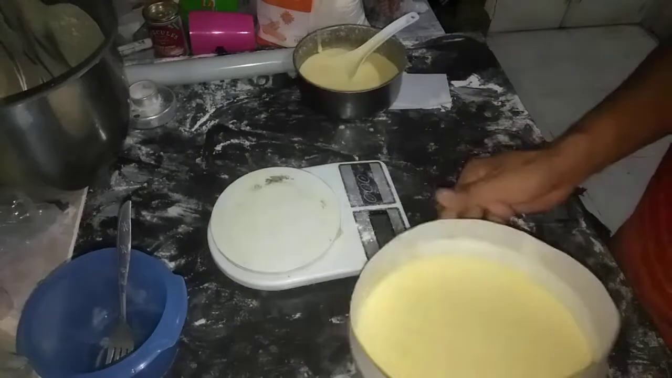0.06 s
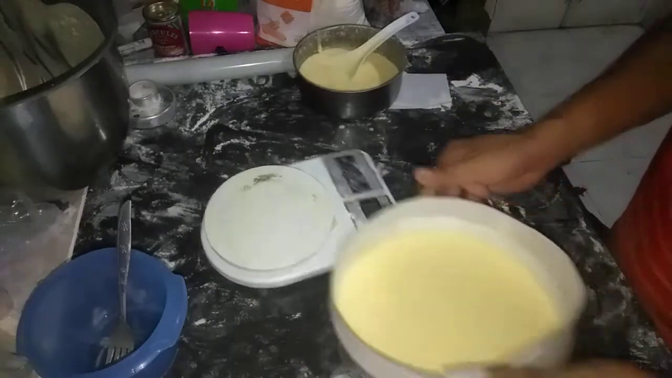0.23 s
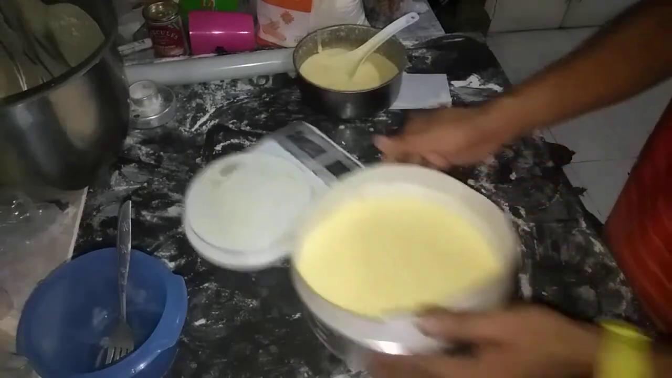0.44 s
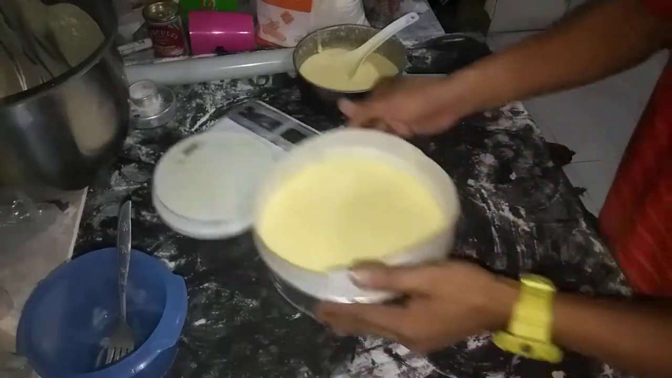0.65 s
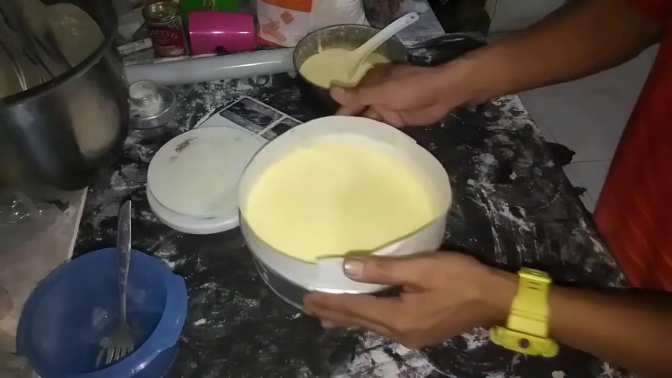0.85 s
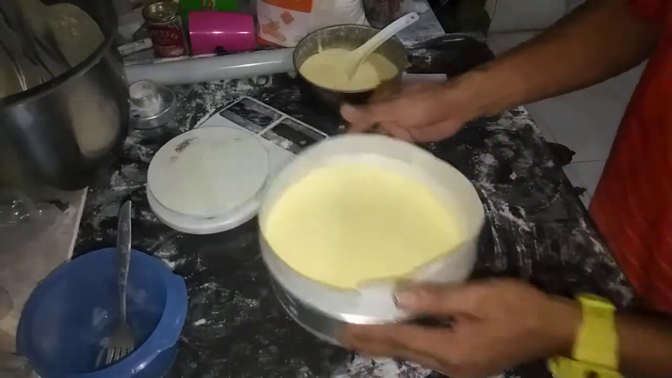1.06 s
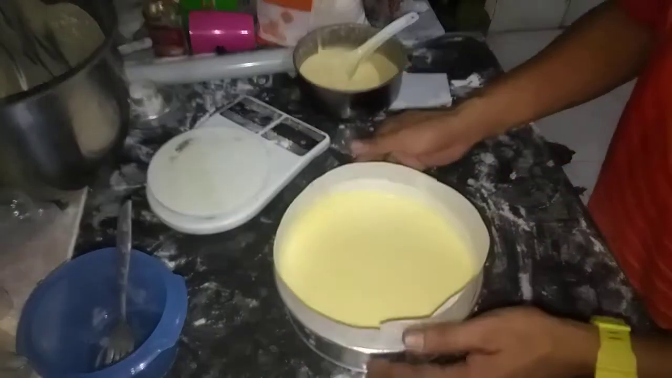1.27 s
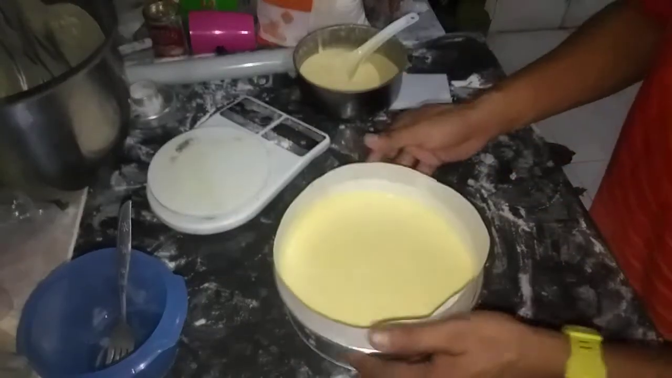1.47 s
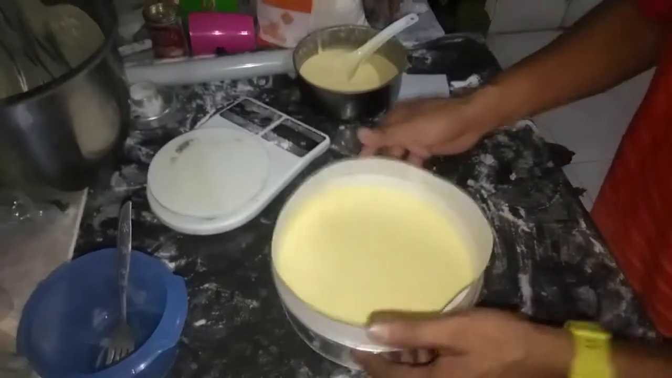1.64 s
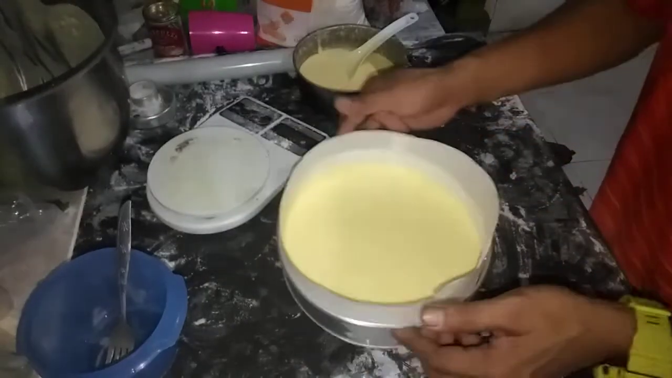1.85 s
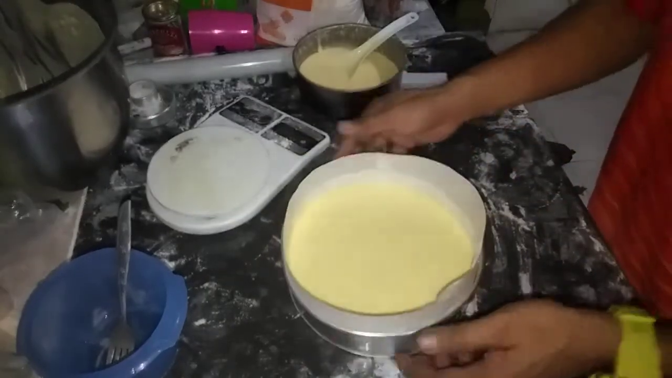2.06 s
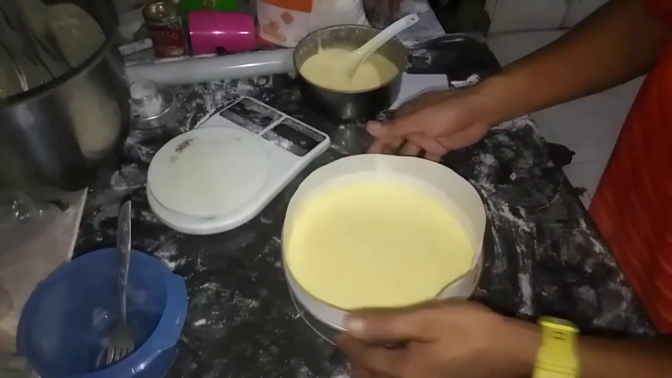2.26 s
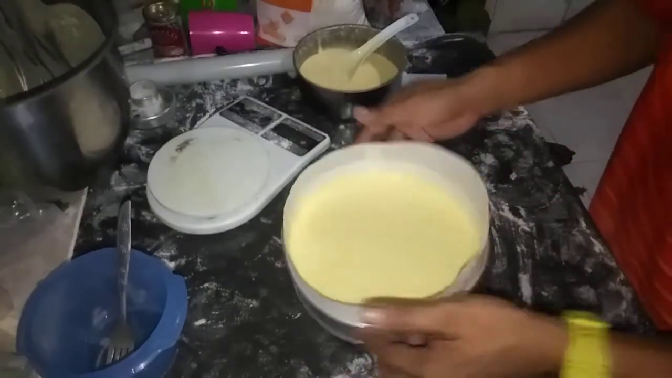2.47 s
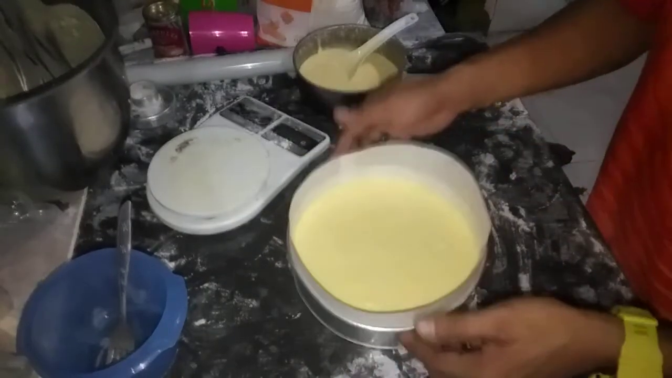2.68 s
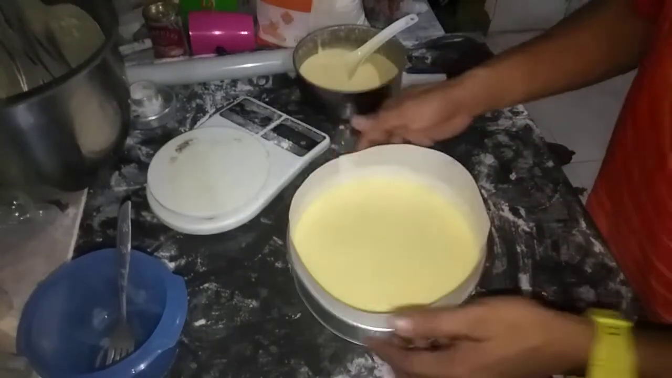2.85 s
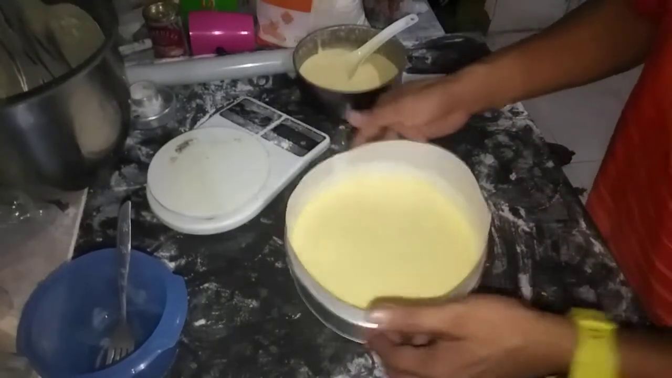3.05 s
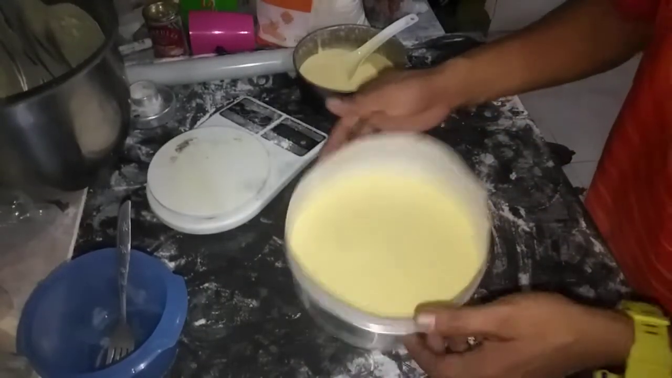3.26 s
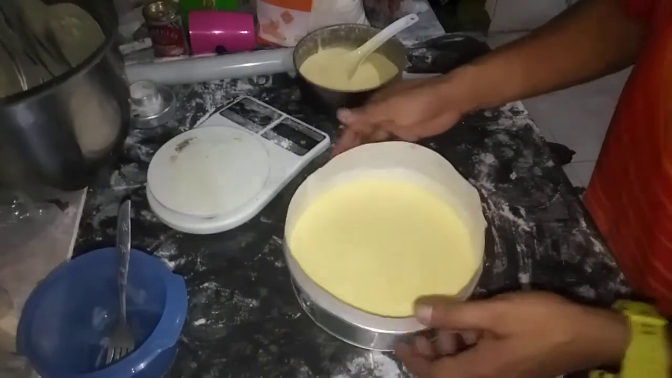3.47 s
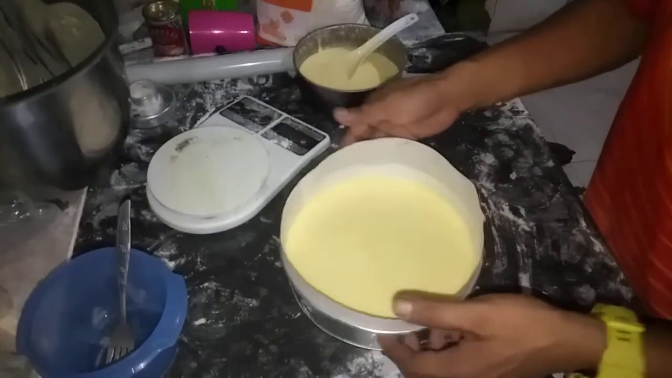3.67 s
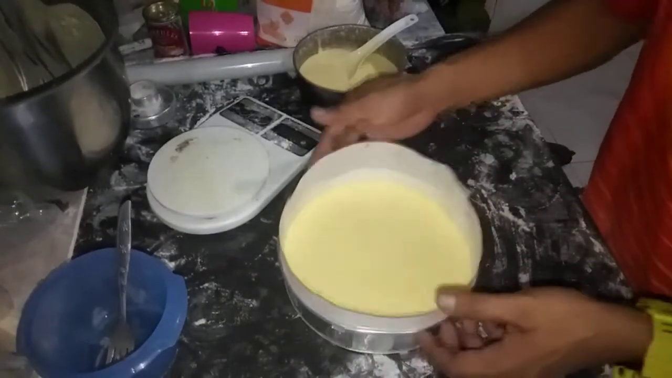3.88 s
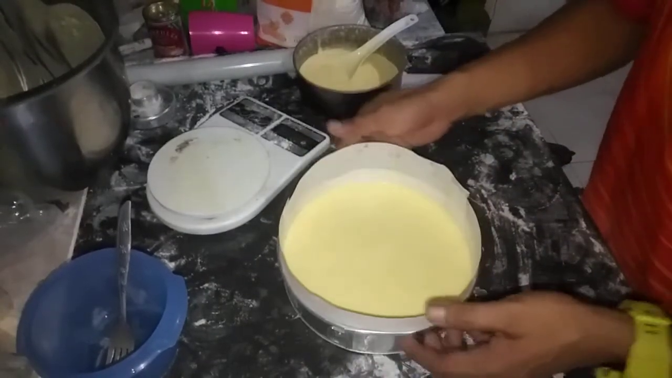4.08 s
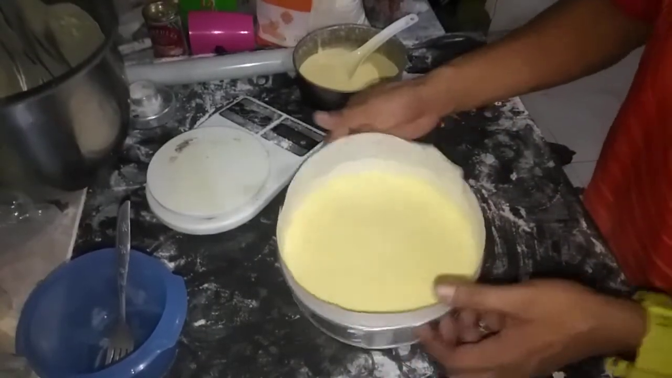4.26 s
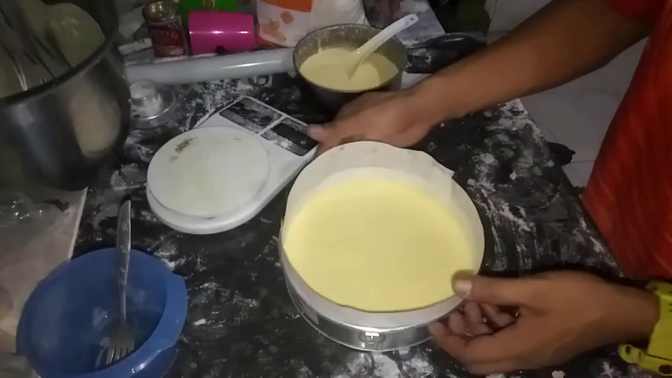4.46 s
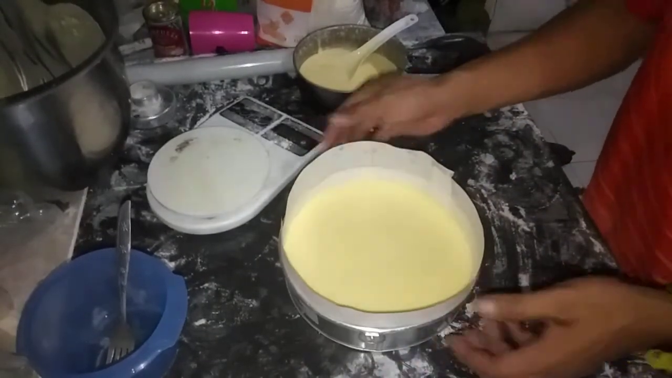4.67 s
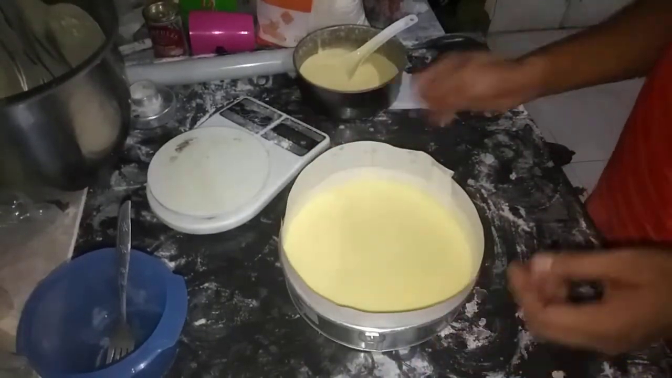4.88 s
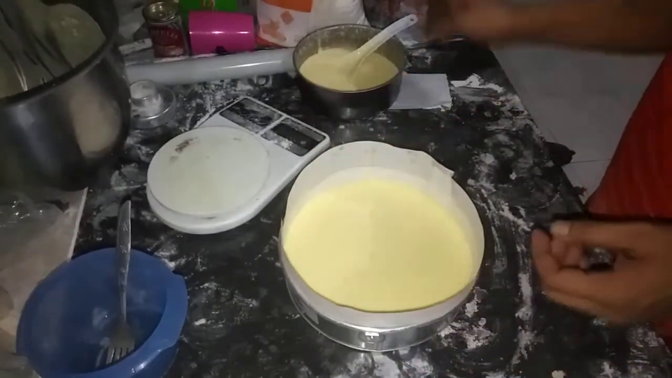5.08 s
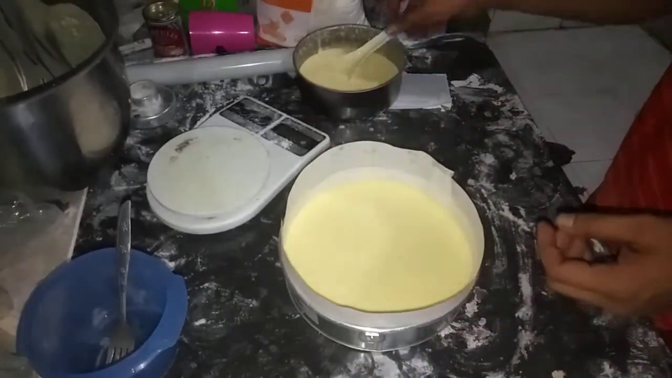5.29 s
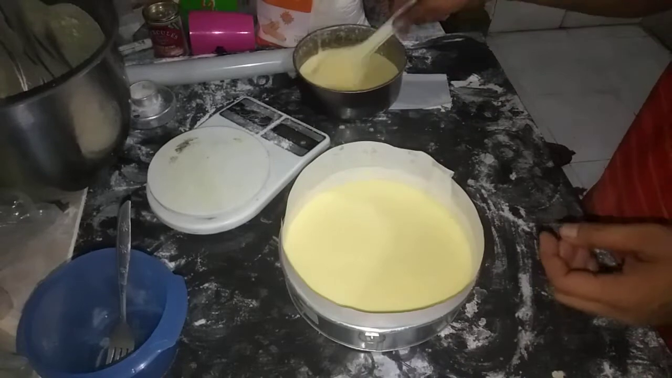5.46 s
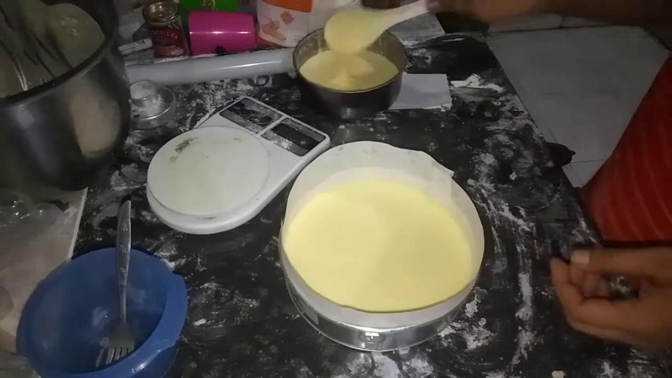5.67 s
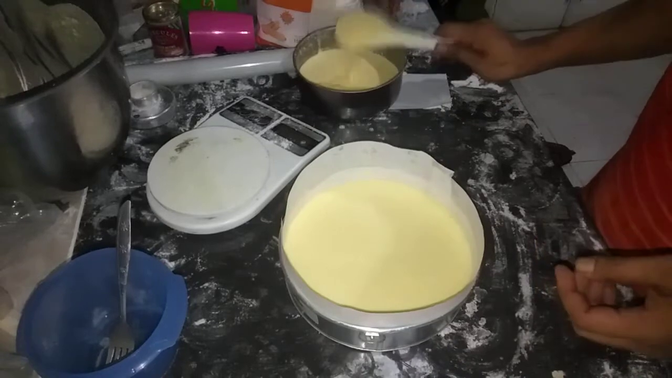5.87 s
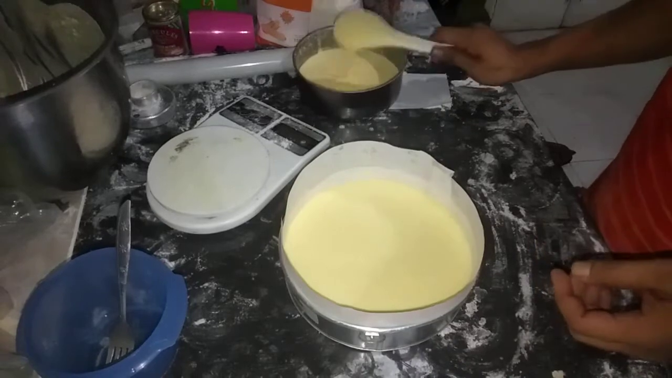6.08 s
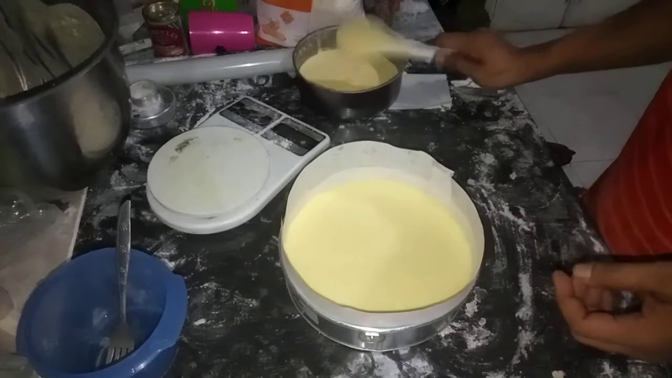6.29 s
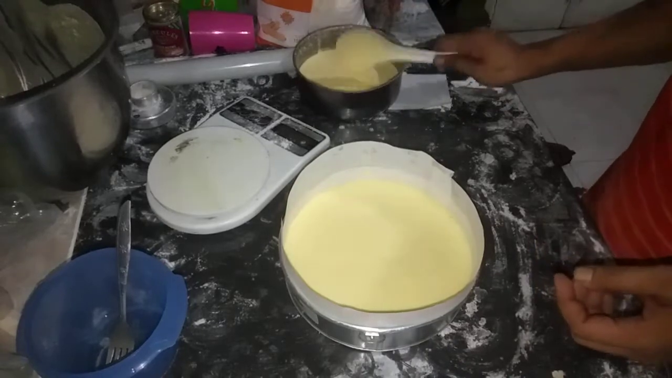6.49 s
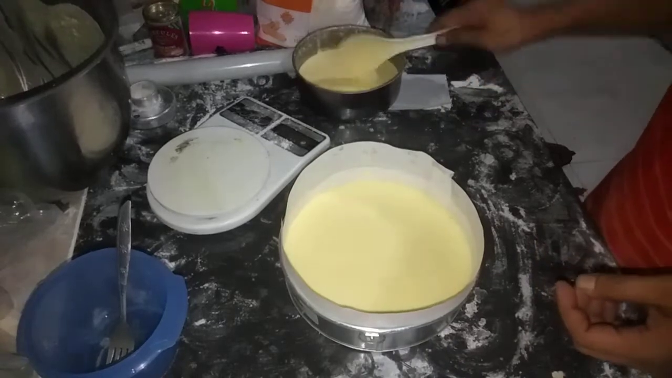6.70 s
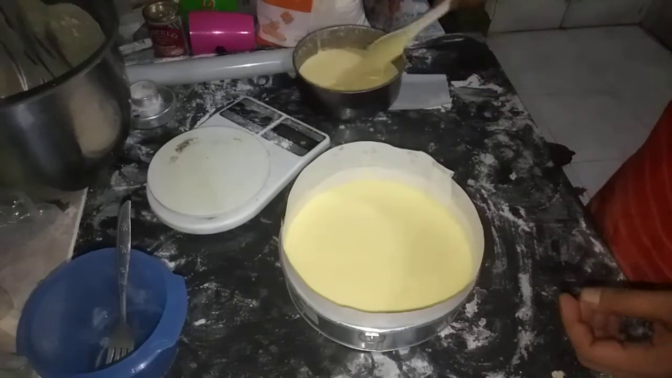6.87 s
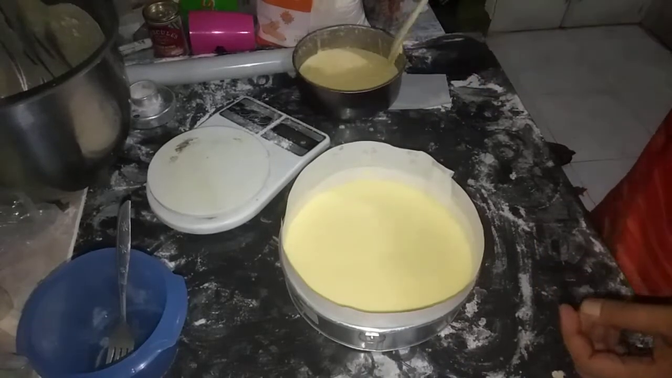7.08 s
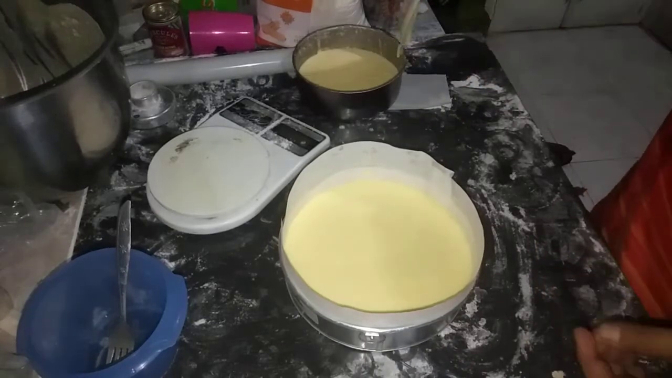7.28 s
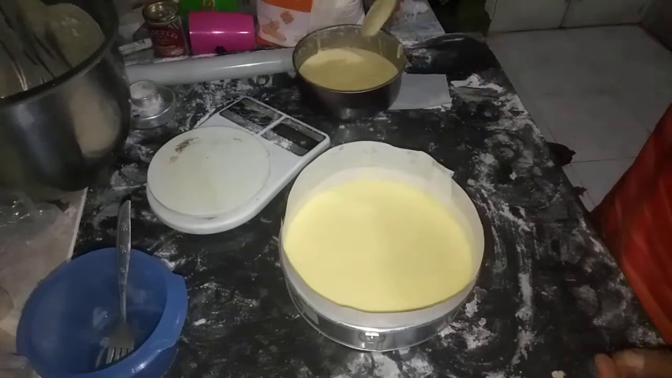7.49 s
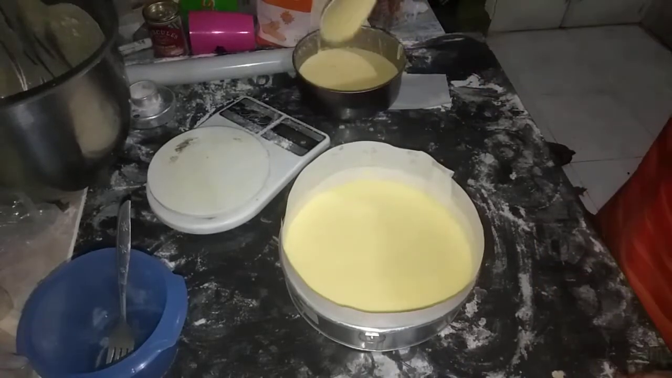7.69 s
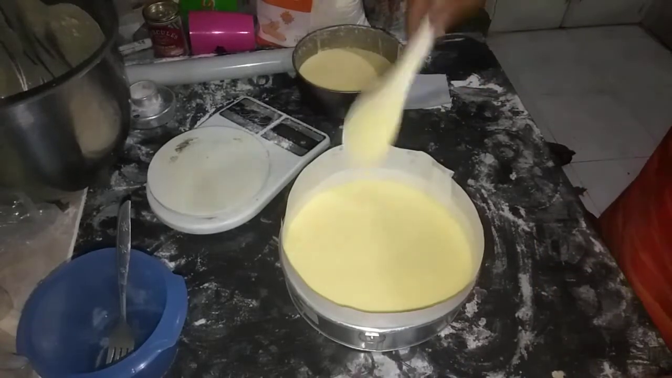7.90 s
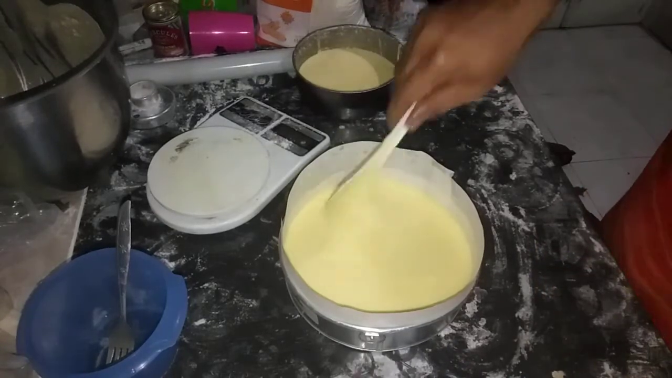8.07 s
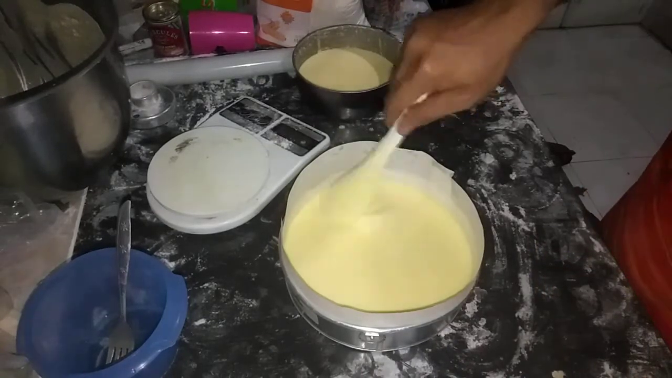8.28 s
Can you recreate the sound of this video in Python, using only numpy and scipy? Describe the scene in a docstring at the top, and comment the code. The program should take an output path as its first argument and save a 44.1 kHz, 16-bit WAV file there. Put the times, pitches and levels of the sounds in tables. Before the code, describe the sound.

After a faint scrape, six heavy, dull pan slams echo off hard kitchen walls, followed by five small bowl taps and a handle clack.

```python
"""A plastic kitchen scale is pushed aside on a stone counter: scraping noise, and bumps where its feet catch.
A batter-filled cake pan is then rapped down six times, rim first and then flat. A spatula is knocked on a bowl's
rim five times, and its handle drops against the rim. Each blow is a pulse built from quickly dying tones; it shakes
the counter and echoes in a hard-walled kitchen. Throughout there is shaped noise: quiet hum, faint rustle and
microphone hiss."""
import sys
import numpy as np
from scipy import signal
from scipy.io import wavfile
from scipy.ndimage import uniform_filter1d

SR = 44100
rng = np.random.default_rng(int(sys.argv[2]) if len(sys.argv) > 2 else 0)


def dump(signal):
    """Clip the signal to [-1, 1] and save it as 16-bit WAV at the path in sys.argv[1]."""
    limited = np.clip(np.atleast_2d(signal).T, -1, 1)
    pcm = np.round(limited * 32767).astype(np.int16)
    wavfile.write(sys.argv[1], SR, pcm)


N = 367794  # length in samples


def gain_of(db):
    """Turns decibels into a factor."""
    return 10 ** (np.asarray(db) / 20)


def evened(x):
    """Scales a signal to an rms of 1."""
    return x / np.sqrt(np.mean(x ** 2) + 1e-20)


def read(points, hz, axis=1):
    """Reads one column of a table at any frequency, with straight lines on a log-frequency axis."""
    table = np.transpose(points)
    return np.interp(np.log(hz + 1), np.log(table[0] + 1), table[axis])


def add(mix, s, sound):
    """Mixes a sound in at s seconds, cutting it off at the end of the mix."""
    part = mix[round(s * SR):][:len(sound)]
    part += sound[:len(part)]


def pan_raps():
    """The batter-filled pan meets the stone rim first and then flat; the batter damps its tones quickly."""
    # Every touch of the pan on the stone.
    # Each row: start in seconds, then thud, clack, crack, tick and counter level in dB.
    raps = [(1.1884, -23, -15.5, -17, -40, -56), (1.1918, -16, -23, -15.5, -37, -39.5),
            (1.194, -23.5, -17.5, -23, -35.5, -34), (1.9648, -12.5, -12.5, -28, -54, -44.5),
            (1.9737, -25.5, -20, -7.5, -28, -33.5), (1.9773, -26, -8, -8, -30.5, -41),
            (2.6818, -22, -12, -19.5, -49.5, -50.5), (2.6924, -19, -21, -9.5, -36, -35.5),
            (3.3108, -19.5, -11.5, -17, -39, -41), (3.3244, -18.5, -16, -13.5, -35.5, -37),
            (3.8915, -17, -13, -15, -44, -33.5), (3.8941, -22.5, -14, -13, -33, -41.5),
            (4.3617, -30, -29, -54, -64, -53), (4.4183, -23, -29.5, -48, -63, -44.5),
            (4.4295, -27, -12.5, -7.5, -43, -47.5)]
    # Tones of the pan. Each row: frequency in Hz, relative strength in dB, time to fall by 60 dB in seconds.
    pan = [(293, 4, 0.031), (447.3, 3, 0.018), (600, 0.5, 0.015), (806, -2.5, 0.02), (1110, 0, 0.0054),
           (1270, 0, 0.0077), (1447, -7, 0.012), (1810, 1, 0.0061), (2220, -3, 0.0072), (2770, 1.5, 0.0047),
           (3440, -4, 0.0011), (3780, -11.5, 0.0045), (4760, -16, 0.0021), (8130, -2.5, 0.0025),
           (11550, -4, 0.0028), (13300, 1, .0025), (14700, -10.5, .002)]
    return blows(raps, pan, [650, 1000, 1700, 2500, 5200, 7000],
                 shake_db=-6.5, chatter=0.13, chatter_s=0.0035)


def spatula_knocks():
    """The spatula hits the bowl's rim to shake batter off; batter in the bowl damps its tones."""
    # Each row: start in seconds, then thud, clack, crack, tick and counter level in dB.
    knocks = [(5.8347, -23, -24.5, -37, -40.5, -47), (6.0157, -22.5, -26.5, -37, -39, -47.5),
              (6.179, -22, -26.5, -38, -40.5, -49), (6.34, -23, -27, -37.5, -42, -44),
              (6.51, -25, -21, -45, -51, -46)]
    # Tones of the bowl. Each row: frequency in Hz, relative strength in dB, time to fall by 60 dB in seconds.
    bowl = [(294, -6.5, 0.043), (467, 4.5, 0.02), (690, 3.5, 0.011), (1070, 2.5, 0.005), (1630, -6, 0.005),
            (1800, -17.5, 0.015), (2680, 7, 0.005), (3630, -7.5, 0.0055), (5060, -4.5, 0.0077),
            (7780, 5, 0.003), (11000, 1.5, 0.0021), (13100, -1.5, 0.0033)]
    return blows(knocks, bowl, [800, 1200, 1800, 2500, 5500, 7000],
                 shake_db=-8.0, chatter=0.06, chatter_s=0.006)


def handle_drop():
    """The spatula, let go, drops its handle against the rim and makes the handle's tones ring."""
    # Each row: start in seconds, then thud, clack, crack, tick and counter level in dB.
    drop = [(6.8553, -29, -24.5, -22.5, -42.5, -55.5)]
    # Tones of the handle. Each row: frequency in Hz, relative strength in dB, time to fall by 60 dB in seconds.
    handle = [(443, -1, 0.047), (700, 1.5, 0.015), (1240, 0, 0.0026), (1840, 0.5, 0.0069),
              (2500, 1.5, 0.0051), (3120, 2.5, 0.0022), (5170, -7, 0.002), (7500, -4, 0.0033),
              (11000, 2, 0.0043), (12200, -4, .003)]
    return blows(drop, handle, [800, 1200, 1900, 2500, 5500, 7000],
                 shake_db=-3.5, chatter=0.16, chatter_s=0.004)


def scale_bumps():
    """The scale's feet catch on the stone as it slides, and each catch makes its body ring."""
    # Each row: start in seconds, then thud, clack, crack, tick and counter level in dB.
    bumps = [(.0265, -64, -43, -52, -55.5, -72), (.165, -68.5, -52, -40.5, -60, -62),
             (.174, -50, -59, -58, -64, -71), (.187, -47.5, -48, -52, -65, -70),
             (.202, -53.5, -50.5, -51, -65, -57), (.6446, -43.5, -41.5, -50, -65.5, -56.5)]
    # Tones of the scale. Each row: frequency in Hz, relative strength in dB, time to fall by 60 dB in seconds.
    scale = [(303, -14, 0.023), (473, 12, 0.021), (715, 3, 0.014), (1120, -2, 0.019), (2020, 0, 0.0039),
             (3210, 2, 0.003), (9060, 8, 0.0024)]
    return blows(bumps, scale, [800, 1000, 1500, 2300, 5000, 7000],
                 shake_db=-8.5, chatter=0.13, chatter_s=0.008)


def blows(events, modes, split_hz, shake_db, chatter, chatter_s):
    """Each blow rings the body's tones (modes) band by band and moves the counter.

    Returns five rows: the direct sound, what goes out into the room from three spots in turn, and the counter.
    """
    # The slab shakes below 50 Hz and the cupboard booms above.
    # Each row: frequency in Hz, strength in dB before shake_db and the blow, time to fall by 60 dB in seconds.
    counter_modes = [(21, -7, 2.1), (31, -4.5, 0.7), (36.7, -8.5, .6), (66, -11.5, 0.36),
                     (80.6, -11.5, 0.34), (104.6, -7, 0.76), (127, -4.5, 0.54), (141.3, 1, 0.34),
                     (194, -6.5, 0.23)]
    body, spread, slab = np.zeros(N), np.zeros((3, N)), np.zeros(N)
    hz = np.transpose(modes)[0]
    low_hz = np.transpose(counter_modes)[0]
    slab_db = np.where(low_hz < 50, shake_db, 0)
    counter = ring(counter_modes, 1.5)
    # The spot struck favours some modes, by a few dB.
    spots = 1.5 * rng.standard_normal((len(events), len(modes) + len(counter_modes)))
    jolts = rng.standard_normal((len(events), 1024))
    chatter_fade = np.exp(-np.arange(1024) / (chatter_s * SR))
    for k, (event, spot, jolt) in enumerate(zip(events, spots, jolts)):
        s, thud_db, clack_db, crack_db, tick_db, counter_db = event
        # Thud, clack, crack and tick are four bands from low to high, blended between the split points.
        band_db = [thud_db, clack_db, clack_db, crack_db, crack_db, tick_db]
        db = np.interp(np.log(hz), np.log(split_hz), band_db)
        pulse = strike(modes, gain_of(db + spot[:len(modes)]), contact_hz=3000, size_hz=208)
        contact = chatter * jolt * chatter_fade  # the body chatters as it settles
        contact[0] = 1
        add(body, s, signal.fftconvolve(pulse, contact / np.linalg.norm(contact)))
        add(spread[k % 3], s, pulse)
        add(slab, s, gain_of(counter_db + slab_db + spot[len(modes):]) @ counter)
    return np.vstack([body, spread, slab])


def strike(modes, gains, contact_hz, size_hz):
    """The sharpest pulse that starts at the blow and holds all the damped modes, added in power."""
    hz, db, t60 = np.transpose(modes)[:, :, None]
    f = np.abs(np.fft.fftfreq(4096, 1 / SR)) + 1
    rate = np.log(1000) / t60
    # Each damped mode is a resonance peak in the spectrum.
    resonance = SR * 2 * np.pi * hz / np.abs((2j * np.pi * f + rate) ** 2 + (2 * np.pi * hz) ** 2)
    peaks = gains[:, None] * gain_of(db) * resonance
    peaks = peaks / (1 + np.maximum(f - hz, 0) / contact_hz) ** 2  # a contact of finite length adds no treble
    size = 1 / (1 + (size_hz / f) ** 2)  # a small body radiates little bass
    log_gain = np.log(np.sqrt((peaks ** 2).sum(0)) * size + 1e-9)
    # Minimum phase: the loudness of each frequency sets its timing, so the energy comes as early as it can.
    spectrum = np.exp(np.conj(signal.hilbert(log_gain)))
    return -np.fft.ifft(spectrum).real[:2048]


def ring(modes, length):
    """Dying sines of a heavy body, one row a mode; it takes a few milliseconds to get moving."""
    hz, db, t60 = np.transpose(modes)[:, :, None]
    t = np.arange(round(length * SR)) / SR
    rise = 1 - np.exp(-t / 0.0052)
    return rise * gain_of(db - 60 * t / t60) * np.sin(2 * np.pi * hz * t)


def kitchen(x):
    """Hard walls answer with sparse echoes of random sign, each frequency band dying at its own speed."""
    # Each row: frequency in Hz, time to fall by 60 dB in seconds, echo level in dB before the near boost.
    echo_bands = [(100, .55, 6.5), (292.6, 0.46, -9), (707.6, 0.57, -2), (1400, 0.55, 1), (2580, 0.5, -8.5),
                  (4630, 0.32, -9), (8350, 0.35, -8), (13000, 0.2, -9.5)]
    taps = np.zeros(SR)
    at = np.arange(160, SR - 20, 20)  # one echo in every 20 samples
    taps[at + rng.integers(0, 20, len(at))] = rng.choice([-1., 1.], len(at))
    hz, t, z = signal.stft(taps, SR, nperseg=256)
    t60 = read(echo_bands, hz)[:, None]
    level_db = read(echo_bands, hz, axis=2)[:, None]
    echo_power = t60 * SR / 20 / (6 * np.log(10))  # long tails hold more echoes; this evens the bands
    decay = gain_of(level_db - 60 * t / t60) / np.sqrt(echo_power)
    near = np.sqrt(1 + 5.5 * np.exp(-t / 0.014))  # the counter, tiles and bowls close by echo first and loudest
    tail = signal.istft(z * decay * near, SR, nperseg=256)[1]
    return signal.fftconvolve(x, tail)[:N]


def scrape():
    """The sliding scale makes rough noise; each push swells in, holds, and fades as the scale slows."""
    # Each row: start in seconds, length in seconds, scraping level in dB.
    pushes = [(-.08, 0.103, -57), (0.255, 0.449, -57.5)]
    # Tone colour of the scraping. Each row: frequency in Hz, relative level in dB per Hz.
    scrape_colour = [(59, -30.5), (100, 2.5), (160, -1.5), (289, -26), (471, -0.5), (676, 5.5), (854, -2),
                     (1150, 0.5), (1800, 2), (4670, -14), (6560, -29), (13200, -17.5), (16000, -27.5)]
    rise_s, fade_db_per_s = 0.061, 61.5
    start, length, db = np.transpose(pushes)[:, :, None]
    t = np.arange(N) / SR - start
    fade_db = fade_db_per_s * np.maximum(t - length, 0)
    push = np.clip(t / rise_s, 0, 1) * gain_of(db - fade_db)
    return push.max(0) * noise(scrape_colour, patchy_db=2.5)


def noise(spectrum, patchy_db):
    """Coloured noise of rms 1 whose loudness drifts in patches of time and frequency."""
    frames, hz = N // 256 + 5, np.fft.rfftfreq(1024, 1 / SR)
    a, b, patches = rng.standard_normal((frames, 513, 3)).T
    patches = uniform_filter1d(patches, size=10, axis=0)  # smooth over frequency
    patches = evened(uniform_filter1d(patches, size=16, axis=1))  # and over time
    z = (a + 1j * b) * gain_of(read(spectrum, hz)[:, None] + patchy_db * patches)
    return evened(signal.istft(z, nperseg=1024, noverlap=768)[1][:N])


def rustle():
    """Moving hands and clothes make soft swells of noise over a faint steady floor."""
    # Each row: middle in seconds, half length in seconds, rustle level in dB.
    moves = [(0.013, 0.22, -62.5), (0.535, 0.15, -63), (1.227, 1, -69), (1.795, .12, -74), (2.297, .2, -70),
             (3.16, 0.063, -71.5), (3.69, .12, -77), (5.292, 0.035, -78.5), (6.905, 0.17, -67),
             (7.29, 0.079, -68), (7.693, 0.27, -72), (7.99, 0.077, -73)]
    # Tone colour of the rustle. Each row: frequency in Hz, relative level in dB per Hz.
    rustle_colour = [(700, -26), (1300, -7.5), (2000, 3), (3200, 0.5), (5200, -7), (6300, -23.5),
                     (9000, -41)]
    t = np.arange(N) / SR
    swells = sum(gain_of(db) * np.exp(-((t - s) / half) ** 2) for s, half, db in moves)
    floor_db = -83.5
    return (gain_of(floor_db) + swells) * noise(rustle_colour, patchy_db=3.0)


def hum():
    """Low noise with wavering bands in it, whose level slowly rises and falls."""
    # Each row: time in seconds, hum level in dB before its two parts are balanced.
    hum_level = [(0, -70), (1.1, -70.5), (1.55, -63.5), (2, -67), (2.9, -71), (3.8, -67), (4.2, -63.5),
                 (5.1, -68.5), (5.6, -66), (6.3, -61.5), (7.2, -68.5), (8.34, -66.5)]
    # Tone colour of the hum. Each row: frequency in Hz, relative level in dB per Hz.
    hum_colour = [(12, -39.5), (20, -7.5), (54, 3), (75, -16.5), (135, -5.5), (165, -11.5), (187, -12.5),
                  (270, -5), (307, -16.5), (349, -23), (513, -8.5), (628, -18.5), (701, -14.5),
                  (1150, -19.5), (1600, -27), (2080, -52), (3520, -120)]
    t = np.arange(N) / SR
    level = gain_of(np.interp(t, *np.transpose(hum_level)))
    return level * (gain_of(3.0) * noise(hum_colour, patchy_db=2.5) + gain_of(-4.0) * drone())


def drone():
    """Narrow bands of noise that come and go inside the hum."""
    # Each row: middle frequency in Hz, width in Hz, relative level in dB before the swell.
    drone_bands = [(147, 33, -6.5), (280, 25, -5.5), (412, 24, -6.5), (531, 37, 1), (662, 90, -4.5),
                   (820, 28, -9.5)]
    out = np.zeros(N)
    for hz, width, db in drone_bands:
        edges = [hz - width / 2, hz + width / 2]
        band_filter = signal.butter(1, edges, "band", fs=SR, output="sos")
        band = signal.sosfilt(band_filter, rng.standard_normal(N))
        swell = evened(uniform_filter1d(rng.standard_normal(N), size=8000))
        out += gain_of(db + 2.5 * swell) * evened(band)
    return out


def hiss():
    """Microphone hiss: noise at a steady level."""
    # Tone colour of the hiss. Each row: frequency in Hz, relative level in dB per Hz.
    hiss_colour = [(900, -6.5), (1800, -6), (3000, -7.5), (6300, -11), (9500, -12.5), (13000, -10.5),
                   (15500, -10), (16000, -3)]
    return gain_of(-67) * noise(hiss_colour, patchy_db=1.2)


def scene():
    """Blows and their kitchen echoes, the slab heard through the stand, the scraping and the background."""
    hits = pan_raps() + spatula_knocks() + scale_bumps() + handle_drop()
    direct, *spread, slab = hits
    echoes = sum(map(kitchen, spread + [gain_of(-4.0) * slab]))
    background = hum() + rustle() + hiss()
    return (direct + echoes + slab + scrape() + background)[None]


def record(dry):
    """A slow gain control sinks under loud blows, the input rounds off high peaks, and the top treble is cut."""
    threshold_db, share, memory_s, settle_s = -41, 0.43, 2.4, 0.08  # share: part of the excess dB removed
    keep = np.exp(-1 / (memory_s * SR))
    power = signal.lfilter([1 - keep], [1, -keep], dry ** 2)
    excess_db = 10 * np.log10(1 + power / gain_of(2 * threshold_db))  # bends in softly around the threshold
    settle = np.exp(-1 / (settle_s * SR))
    smooth_db = signal.lfilter([1 - settle], [1, -settle], excess_db)
    ducked = dry / gain_of(share * smooth_db)
    ceiling = 0.45  # peaks approach this value but never pass it
    rounded = ducked / (1 + np.abs(ducked / ceiling) ** 3) ** (1 / 3)
    low_pass = signal.firwin(511, 15950, window=("kaiser", 9), fs=SR)  # edge in Hz
    return signal.oaconvolve(rounded, low_pass[None], "same")


dry = scene()
out = record(dry)
dump(out)
```